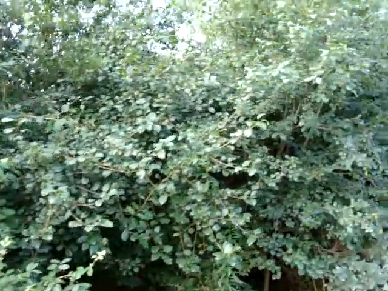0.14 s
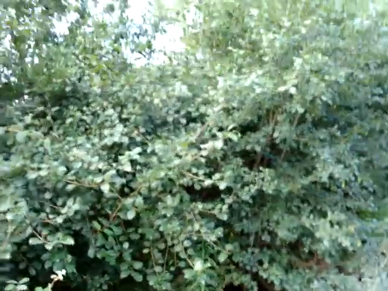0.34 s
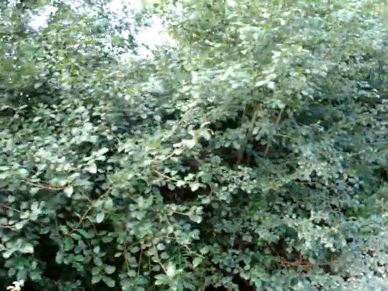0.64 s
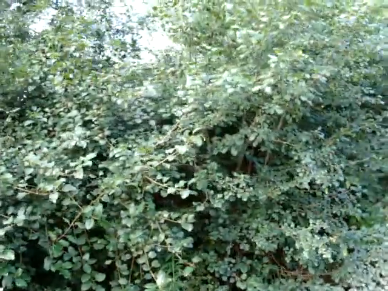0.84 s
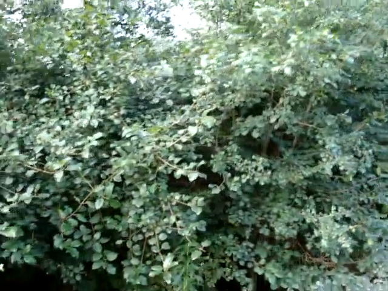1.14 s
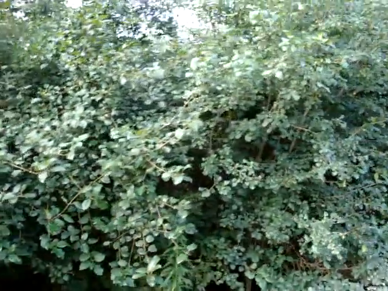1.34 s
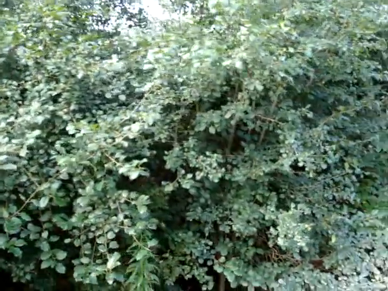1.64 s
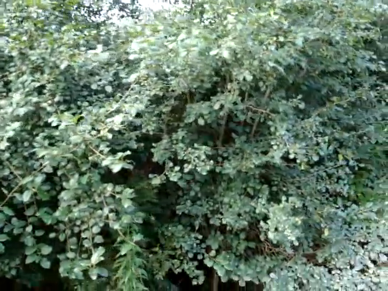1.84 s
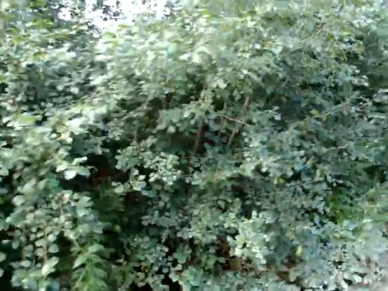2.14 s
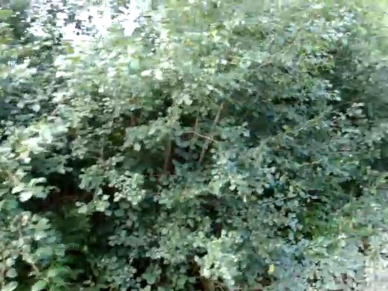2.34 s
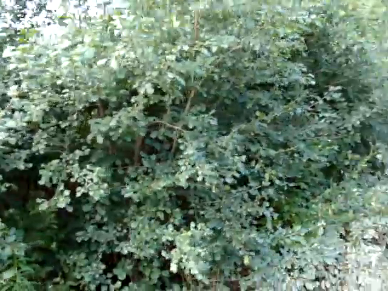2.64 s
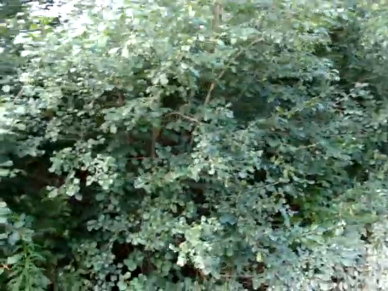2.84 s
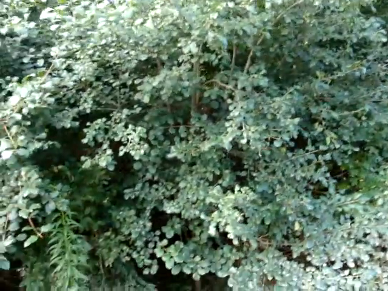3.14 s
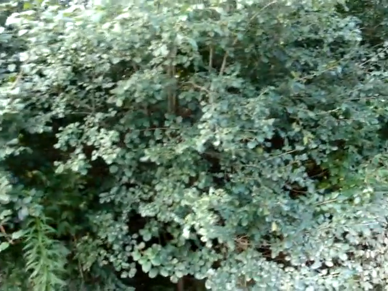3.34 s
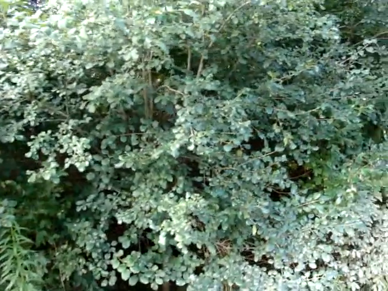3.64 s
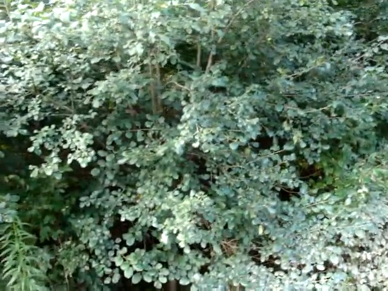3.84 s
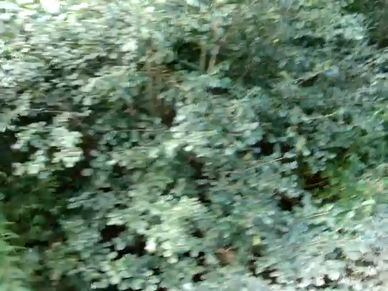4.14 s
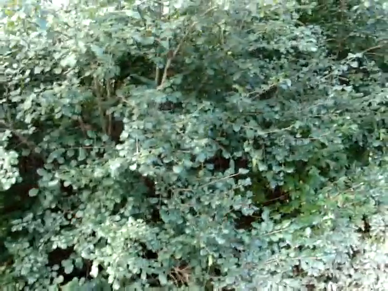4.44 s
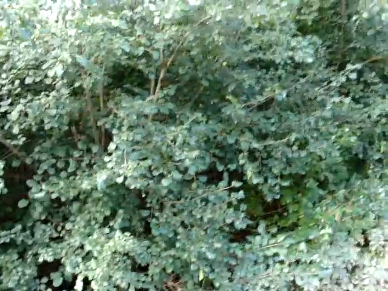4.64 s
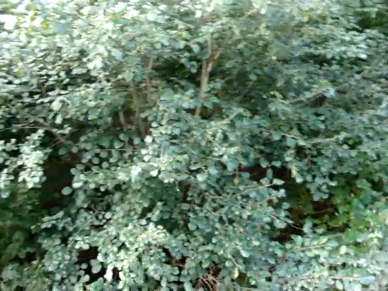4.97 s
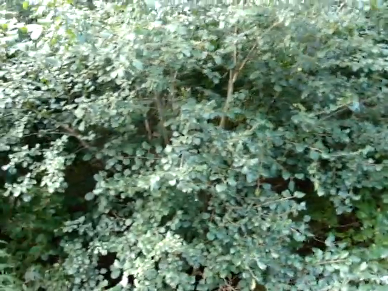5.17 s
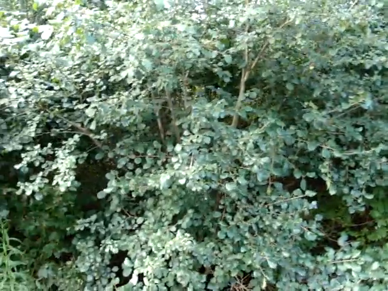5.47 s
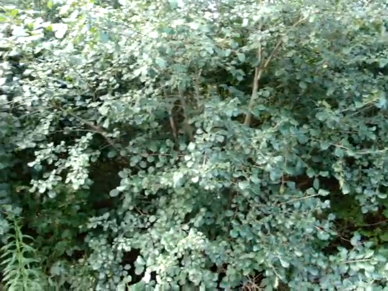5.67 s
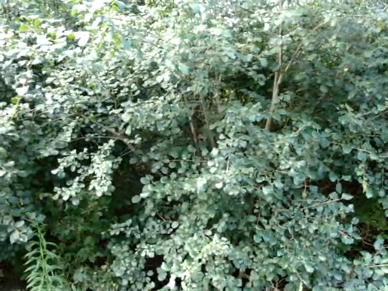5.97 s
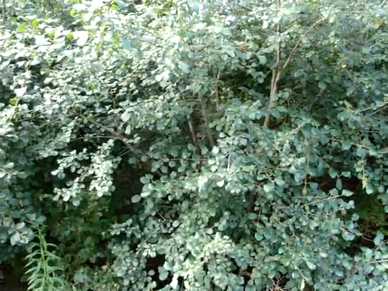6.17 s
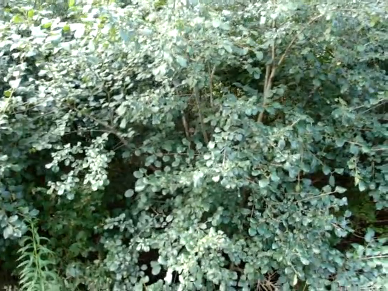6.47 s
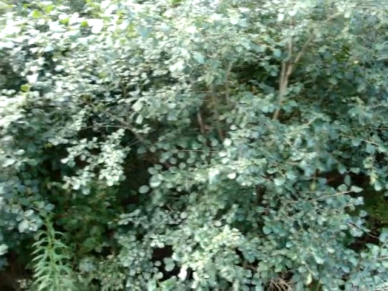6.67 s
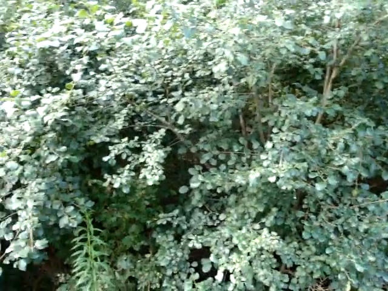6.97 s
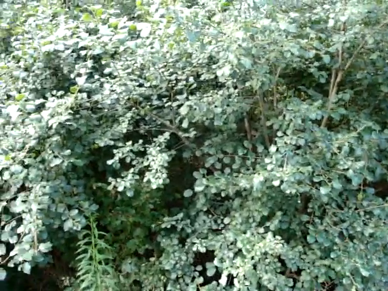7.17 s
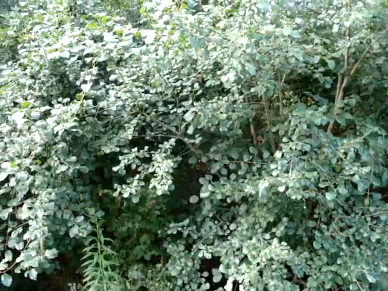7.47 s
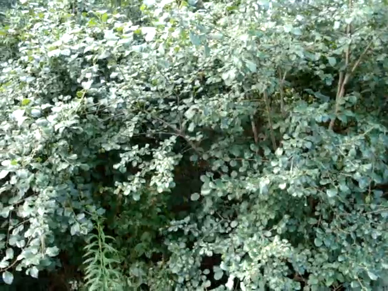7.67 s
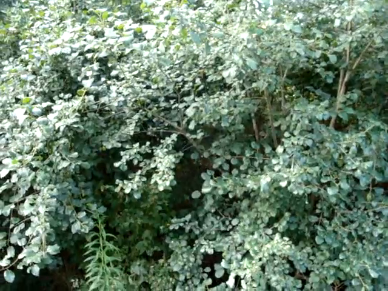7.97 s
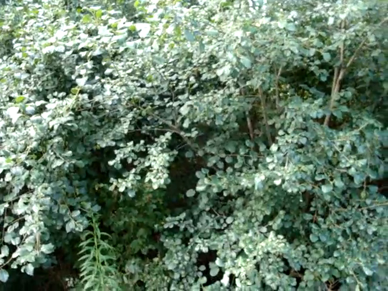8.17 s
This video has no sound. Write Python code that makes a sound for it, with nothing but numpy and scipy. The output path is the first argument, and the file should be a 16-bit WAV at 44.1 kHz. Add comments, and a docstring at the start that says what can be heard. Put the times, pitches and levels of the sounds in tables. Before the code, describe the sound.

A small pack of beagles cries on a scent behind thick brush, a little away from a small camera microphone with cut-off top treble. From 0 to 2.4 seconds, quick high yelps, starting as falling whistles and cracking into rasp, overlap lower, longer bawls that swell, break hoarsely and fade. A soft thud falls near 0.3 and a thin, very high faint note near 1.6. A strong rising bawl comes at 2.6, then yelps and a short bawl from 3.1 to 3.7. The chorus thins: close twig snaps and dull thuds at 4.2 and 4.7, a faint whimper at 4.3, one yelp at 4.6, sharper snaps around 5.0 and 5.4. Single yelps return at 6.0 and 6.6, with a tiny snap at 6.3. From 7 seconds yelps and bawls overlap again to the end. Leaves and trees return a diffuse decaying echo over quiet air, insect hiss and faint low hum.

```python
"""Beagles yelp and bawl on a scent behind a thick hedge: vocal-fold harmonics and breath noise, throat-filtered.
Yelps open as a whistle and crack into a rasp; the lower, longer bawls swell, break hoarsely and fade.
Brush and trees answer each cry, and one faint whimper, with a decaying noise echo.
Close by: twig snaps and dull thuds from ringing noise bursts, and one thin high note.
Behind: filtered noise as air and insect hiss, with wavering sines as a faint low hum."""
import sys
import numpy as np
from scipy import signal
from scipy.fft import rfft, irfft, next_fast_len
from scipy.io import wavfile
from scipy.ndimage import uniform_filter1d, map_coordinates

SR = 44100
rng = np.random.default_rng(int(sys.argv[2]) if len(sys.argv) > 2 else 0)


def store_wav(level_fs):
    """Save 16-bit WAV to argv[1]."""
    pcm = np.round(np.clip(np.atleast_2d(level_fs), -1, 1) * 32767)
    wavfile.write(sys.argv[1], SR, pcm.T.astype(np.int16))


N = 366457

# yelp throat and mouth resonances: freq_hz [Hz], level_db [dB, relative]
YELP_THROAT = [(300, -43), (520, -13.5), (720, 5), (1030, -6), (1310, -1.5), (1600, -6.5), (2150, -2.5),
               (2620, 0), (2950, -7.5), (3350, -5), (3750, -21.5), (7000, -40)]
# short high cries: start_s [s], length_s [s], opening_hz [Hz], held_hz [Hz], closing_hz [Hz], whistle_db [dB],
# crack_s [s after start], tone_db [dB, after the crack], overtone_db [dB, before closing], rough [0-1]
YELPS = [ (-.064, .128, 801.4, 789.4, 783.6, -30, 0.023, -27.5, -27, 0.8),
         (.151, 0.25, 820, 731, 710.6, -25.5, .031, -26.5, -40.5, 0.56),
         (.411, .18, 891.6, 850, 933, -36, 0.0283, -29.5, -28, 0.67),
         (0.773, .222, 704.3, 672, 771, -19, .052, -22, -29, 0.86),
         (1.327, 0.17, 825, 722, 813, -17.5, 0.036, -22.5, -30, 0.78),
         (1.875, .15, 817, 757, 693, -26.5, .036, -29, -33, 0.64),
         (2.018, 0.3, 782.6, 654, 801, -28.5, 0.13, -32, -39.5, 0.44),
         (3.06, 0.17, 960, 958, 966, -29.5, 0.031, -30, -28.5, 0.58),
         (3.536, 0.15, 958, 766.7, 794.4, -22, .044, -23, -30.5, 0.46),
         (4.627, .16, 853.5, 688, 780, -24.5, .028, -29, -31.5, 0.86),
         (6.016, 0.13, 905, 781.7, 812, -22.5, .041, -22, -30, .55),
         (6.618, 0.17, 781, 700, 760, -28, 0.01816, -25.5, -30.5, 0.47),
         (6.998, 0.19, 879.4, 637.6, 940, -28, .022, -25.5, -32.5, 0.58),
         (7.51, 0.48, 838, 719, 735.5, -24, .042, -28.5, -39.5, 0.46),
         (7.98, .18, 809.6, 719, 894, -25, .06, -28.5, -36.5, 0.41)]
WHISTLE_ATTACK_S, RELEASE_PER_LENGTH, GLIDE_PER_CRACK = 0.025, .27, .9
CRACK_S, RECOVER_S = 0.0045, 0.026  # time constants
CHOKE_DB, WHISTLE_ROUGH, CRACK_ROUGH = 10, 0.22, .4
WHISTLE_SHUT_DB, MOUTH_S, YELP_CLOSE_DB_PER_S = 9, 0.051, 28


def yelps():
    """A falling whistle cracks into a rasp as the mouth opens; the tone recovers and the mouth slowly closes."""
    out = np.zeros(N)
    for (start_s, length_s, opening_hz, held_hz, closing_hz,
         whistle_db, crack_s, tone_db, overtone_db, rough) in YELPS:
        t, gate = cry(length_s, WHISTLE_ATTACK_S, RELEASE_PER_LENGTH * length_s)
        since = np.maximum(t - crack_s, 0)
        cracked = .5 + .5 * np.tanh((t - crack_s) / CRACK_S)
        strain = cracked * np.exp(-since / RECOVER_S)
        hz = pitch(t, opening_hz, held_hz, closing_hz, GLIDE_PER_CRACK * crack_s)
        level_db = whistle_db + (tone_db - whistle_db) * cracked - CHOKE_DB * strain
        shut = .5 - .5 * np.tanh((t - crack_s) / MOUTH_S)
        mouth_db = overtone_db - WHISTLE_SHUT_DB * shut - YELP_CLOSE_DB_PER_S * since
        harsh = WHISTLE_ROUGH + (rough - WHISTLE_ROUGH) * cracked + CRACK_ROUGH * strain
        sound = voice(hz, harsh, mouth_db - level_db, YELP_THROAT,
                      jitter=0.0889, growl=0.55, rasp=2.2, tilt=1.2)
        add(out, start_s, gate * undb(level_db) * sound)
    return out


# bawl throat and mouth resonances: freq_hz [Hz], level_db [dB, relative]
BAWL_THROAT = [(290, -23), (410, 2.5), (680, 17.5), (950, 4), (1160, 3), (1550, -8), (2050, -5.5),
               (2450, -10.5), (2790, -5), (3060, -19.5), (7000, -45.5)]
# long low cries: start_s [s], length_s [s], opening_hz [Hz], held_hz [Hz], closing_hz [Hz],
# swell_s [s after start, loudest], tone_db [dB], break_s [s after start], rough [added at the break],
# opening_overtone_db [dB], full_overtone_db [dB, from the break on]
BAWLS = [ (.125, 0.43, 701.3, 611.3, 628, 0.097, -27.5, 0.19, 1.01, -29, -31),
         (0.692, 0.33, 554, 615, 611, 0.064, -34.5, .2, .9, -40.5, -35.5),
         (1.196, .372, 546.2, 674.6, 635, 0.082, -28, 0.26, 1.02, -39, -31.5),
         (1.52, 0.23, 717, 655, 633, .035, -37, 0.095, 0.7, -35, -31.5),
         (1.69, 0.39, 658.6, 621, 544.6, 0.033, -31, 0.22, 1, -34.5, -36.5),
         (2.179, .21, 628, 637.7, 716, .027, -40, 0.06, 0.33, -32.5, -36),
         (2.625, 0.21, 491.2, 735.3, 615, 0.17, -23.5, 0.081, 1.1, -40, -34.5),
         (3.14, 0.22, 701, 668, 654, 0.03, -30, 0.12, 1.01, -43, -41.5),
         (7.101, .45, 594.7, 598.4, 561.5, 0.063, -27, 0.22, .6, -29.5, -33.5),
         (7.537, 0.27, 586, 590.7, 597, 0.023, -36.5, 0.12, 0.38, -26, -37),
         (7.773, 0.27, 586.6, 595, 589.2, .17, -29, .165, 0.99, -34.5, -38.5),
         (8.005, 0.19, 594.4, 705, 855, 0.049, -32, .025, .35, -26.5, -31.5)]
BAWL_ATTACK_S, BAWL_RELEASE_S, BAWL_GLIDE_S = 0.017, 0.046, .085
SWELL_DB, FADE_DB_PER_S = 21, 33
BREAK_S, BREAK_SAG, BAWL_CLEAN_ROUGH = .068, .1, .13  # sag: pitch share lost per unit of roughness


def bawls():
    """Longer, lower cries with a strong second harmonic swell, break hoarsely with a pitch sag, and fade."""
    out = np.zeros(N)
    for (start_s, length_s, opening_hz, held_hz, closing_hz, swell_s, tone_db,
         break_s, rough, opening_overtone_db, full_overtone_db) in BAWLS:
        t, gate = cry(length_s, BAWL_ATTACK_S, BAWL_RELEASE_S)
        strain = np.exp(-((t - break_s) / BREAK_S) ** 2)
        sag = 1 - BREAK_SAG * rough * strain
        hz = pitch(t, opening_hz, held_hz, closing_hz, BAWL_GLIDE_S) * sag
        rise_db = SWELL_DB * np.maximum(1 - t / swell_s, 0)
        fade_db = FADE_DB_PER_S * np.maximum(t - swell_s, 0)
        level_db = tone_db - rise_db - fade_db
        opened = np.minimum(t / break_s, 1) ** 2
        mouth_db = opening_overtone_db + (full_overtone_db - opening_overtone_db) * opened
        harsh = BAWL_CLEAN_ROUGH + rough * strain
        sound = voice(hz, harsh, mouth_db - level_db, BAWL_THROAT,
                      jitter=0.0642, growl=1.0, rasp=1.95, tilt=1.53)
        add(out, start_s, gate * undb(level_db) * sound)
    return out


def voice(hz, rough, open_db, throat, jitter, growl, rasp, tilt, stumble=0.0352, shimmer_db=1.02):
    """Vocal folds that turn chaotic under strain, heard through throat and mouth."""
    size, rough = len(hz), np.clip(rough, 0, 1)
    unrest = stumble * wander(size, 130.9) + jitter * wander(size, 420)
    waver = 0.01583 * wander(size, 39.88) + rough * unrest
    phase = 2 * np.pi * np.cumsum(hz * (1 + waver)) / SR
    folds = sum(np.sin(k * phase) / k ** tilt for k in range(1, 8))
    # strained folds stumble in groups of three beats: lines beside the harmonics
    lope = np.sin(phase / 3 + wander(size, 90))
    # loose tissue flaps far more slowly: hoarse sidebands
    flap = np.sin(2 * np.pi * np.cumsum(115 + 45 * wander(size, 34.95)) / SR)
    # air tears through the glottis once a cycle
    air = rng.standard_normal(size) * (1 + np.cos(phase))
    source = folds * (1 + rough * lope) + rasp * rough * air
    source = source * (1 + growl * np.sqrt(rough) * flap)
    # jaw position shifts the resonances from cry to cry
    jaw = 1 + 0.021 * np.clip(rng.standard_normal(), -2, 2)
    sound = colour(source, [(f * jaw, db) for f, db in throat])
    chest = signal.sosfiltfilt(signal.butter(5, 1060, fs=SR, output="sos"), sound)
    overtones = steady(running(sound - chest))
    shimmer = undb(shimmer_db * np.sqrt(rough) * wander(size, 40.6))
    return (steady(chest) + undb(open_db) * overtones) * shimmer


def cry(length_s, attack_s, release_s):
    """Time axis and envelope of one cry: attack, hold, release."""
    t = np.arange(int(length_s * SR)) / SR
    return t, np.clip(t / attack_s, 0, 1) * np.clip((length_s - t) / release_s, 0, 1)


LATE_BEND = 3  # exponent: higher bends later


def pitch(t, opening_hz, held_hz, closing_hz, glide_s):
    """A cry slides onto its held note and bends away from it as the breath runs out."""
    onset_hz = (opening_hz - held_hz) * np.exp(-(t / glide_s) ** 2)
    end_hz = (closing_hz - held_hz) * (t / t[-1]) ** LATE_BEND
    return held_hz + onset_hz + end_hz


def running(x, lag_s=0.002178, slide_s=.0003, share=0.95):
    """A ground bounce whose lag slides as the hound runs, combing the overtones into moving strands."""
    at = np.arange(len(x)) - SR * (lag_s + slide_s * wander(len(x), 11.86))
    return x + share * map_coordinates(x, [at], order=1)


def whine(start_s=4.33, length_s=0.15, base_hz=1095, level_db=-53.5):
    """One faint, thin whimper, arched in pitch and level: harmonics 2 and 3 of an unsounded base."""
    out = np.zeros(N)
    arch = np.sin(np.linspace(0, np.pi, int(length_s * SR)))
    hz = base_hz * (1 + 0.11 * arch + 0.0095 * wander(len(arch), 70))
    phase = 2 * np.pi * np.cumsum(hz) / SR
    add(out, start_s, undb(level_db) * arch * (np.sin(2 * phase) + np.sin(3 * phase)))
    return out


def woods(x, brush_db=-8, brush_t60_s=0.46, trees_db=-11.5, trees_t60_s=1.2):
    """Leaves scatter the sound at once, the treble most; trunks further off return a long tail."""
    t = np.arange(2 * SR) / SR
    brush, trees = rng.standard_normal((2, len(t)))
    brush = unit(brush * undb(-60 * t / brush_t60_s))
    trees = unit(trees * undb(-60 * t / trees_t60_s) * np.clip(t / 0.051, 0, 1))
    echo = (undb(brush_db) * brush + undb(trees_db) * trees) / np.sqrt(len(t))
    echo = colour(echo, [(750, 0), (1500, 6.0), (4000, 5.5)])
    return x + signal.fftconvolve(x, echo)[:N]


# twig snaps: start_s [s], peak_db [dB], ring_hz [Hz], t60_s [s, noise burst],
# splinter_db [dB re 0.5, unfiltered burst in the mix]
SNAPS = [(4.219, -16.5, 740, 0.013, -2), (4.237, -25.5, 1116, 0.0089, -3), (4.731, -28, 7780, 0.025, 3),
         (5.02, -16, 7900, 0.014, 16), (5.067, -18.5, 1160, 0.018, -24), (5.342, -23.5, 3200, 0.038, 0),
         (5.405, -25.5, 2400, 0.032, -3), (6.337, -30, 2380, .02, -8)]


def snaps():
    """Dry twigs crack close by: a sharp break rings the wood, each with a note of its own."""
    out = np.zeros(N)
    for start_s, peak_db, ring_hz, t60_s, splinter_db in SNAPS:
        crack = burst(t60_s)
        crack[0] += 4
        snap = 4.7 * ring(crack, 2230, 120) + 0.44 * ring(crack, 3700, 170)
        snap += 2 * ring(ring(crack, ring_hz, ring_hz), ring_hz, ring_hz)
        snap += 0.84 * ring(crack, 1200, 810) + .5 * undb(splinter_db) * crack
        add(out, start_s, undb(peak_db) * snap / np.abs(snap).max())
    return out


# soft thuds: start_s [s], peak_db [dB], ring_hz [Hz]
BUMPS = [(0.279, -34.5, 215), (4.238, -36, 128.7), (4.698, -25, 362), (4.727, -38, 192)]


def bumps(t60_s=0.064):
    """Dull little thuds: noise bursts through a broad double resonance."""
    out = np.zeros(N)
    for start_s, peak_db, ring_hz in BUMPS:
        thud = ring(ring(burst(t60_s), ring_hz, ring_hz), ring_hz, ring_hz)
        add(out, start_s, undb(peak_db) * thud / np.abs(thud).max())
    return out


def chip(start_s=1.6, rms_db=-53, ring_hz=8900, width_hz=600, t60_s=0.21):
    """One thin, quickly fading note high above the hounds: a noise burst through a double resonance."""
    out = np.zeros(N)
    note = ring(ring(burst(t60_s), ring_hz, width_hz), ring_hz, width_hz)
    add(out, start_s, undb(rms_db) * unit(note))
    return out


# air spectrum, insect bands near 4.7 and 6 kHz: freq_hz [Hz], density_db [dB per Hz, relative]
AIR = [(25, -16.5), (45, -5.5), (300, -7), (700, -8), (1200, -12.5), (3800, -18.5), (4700, -7.5),
       (5400, -16.5), (6100, -12), (7000, -24), (10000, -27.5)]
AIR_RMS_DB = -49.5
# hum partials: pitch_hz [Hz], rms_db [dB]
HUM = [(44, -72), (89, -62), (501, -65)]


def outdoors():
    """Still air with a hiss of insects as shaped noise, and a faint hum of sines wavering in pitch and level."""
    hiss = unit(colour(rng.standard_normal(N), AIR))
    air = hiss * undb(AIR_RMS_DB + .5 * wander(N, 2.66))
    for pitch_hz, rms_db in HUM:
        phase = 2 * np.pi * np.cumsum(pitch_hz + 2 * wander(N, 26)) / SR
        air = air + np.sqrt(2) * undb(rms_db + 2 * wander(N, 2.56)) * np.sin(phase)
    return air


def burst(t60_s):
    """A quarter second of noise that dies away from a sharp start."""
    t = np.arange(SR // 4) / SR
    return rng.standard_normal(len(t)) * undb(-60 * t / t60_s)


def ring(x, hz, width_hz):
    """One resonance, gain 1 at its centre."""
    return signal.lfilter(*signal.iirpeak(hz, hz / width_hz, SR), x)


def colour(x, points):
    """Filter by a spectrum of (Hz, dB) points, interpolated over log frequency."""
    size = next_fast_len(len(x) + 1024)
    hz, db = np.transpose(points)
    f = np.maximum(np.fft.rfftfreq(size, 1 / SR), 1)
    gain = undb(np.interp(np.log(f), np.log(hz), db))
    return irfft(rfft(x, size) * gain, size)[:len(x)]


def steady(x):
    """Hold the rms at 1 over 30 ms, keeping the faster flutter."""
    power = np.abs(uniform_filter1d(x ** 2, int(.03 * SR)))
    return x / np.sqrt(power + 1e-12)


def wander(size, hz):
    """Smooth random motion through hz random points a second, spread about 1."""
    at = np.arange(size) * hz / SR
    return map_coordinates(rng.standard_normal(4096), [at], order=2, mode="wrap")


def undb(db):
    """Decibels to gain."""
    return 10 ** (np.asarray(db) / 20)


def unit(x):
    """Scale to rms 1."""
    return x / np.sqrt(np.mean(x ** 2) + 1e-18)


def add(out, start_s, x):
    """Mix x into out from start_s on; a negative start trims the head of x."""
    i = int(round(start_s * SR))
    x, i = x[max(-i, 0):], max(i, 0)
    out[i:i + len(x)] += x[:len(out) - i]


def scene():
    """Hounds deep in the brush, small sounds near by, open air behind."""
    hounds = woods(yelps() + bawls() + whine())
    near = snaps() + bumps() + chip()
    return (hounds + near + outdoors())[None]


def record(dry, top_hz=9900):
    """A small camera's steep treble cut: elliptic low-pass."""
    return signal.sosfilt(signal.ellip(10, .2, 80, top_hz, fs=SR, output="sos"), dry)


dry = scene()
out = record(dry)
store_wav(out)
```